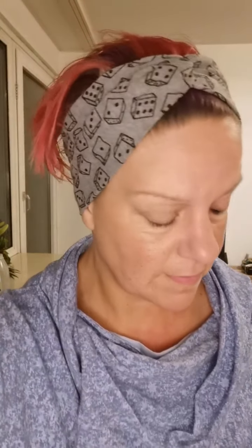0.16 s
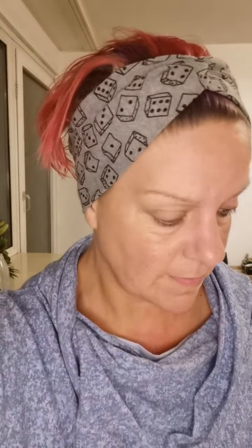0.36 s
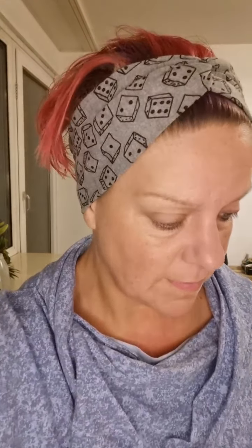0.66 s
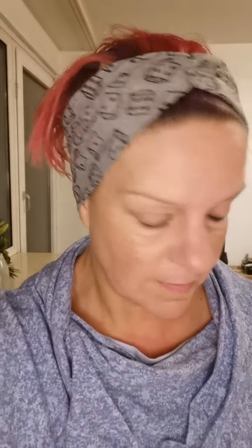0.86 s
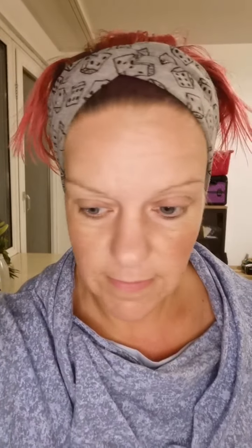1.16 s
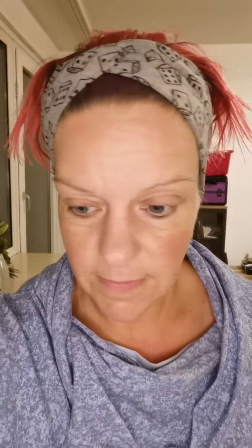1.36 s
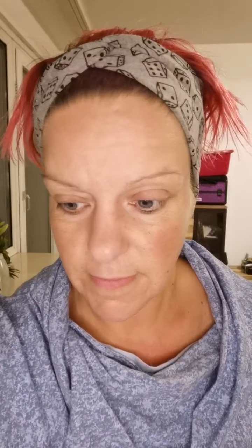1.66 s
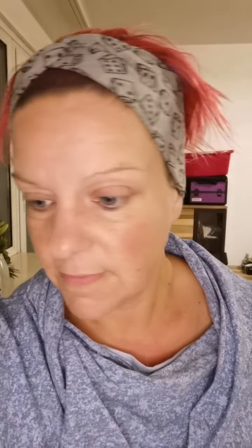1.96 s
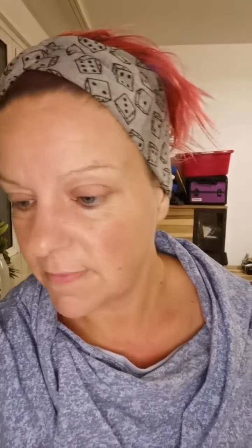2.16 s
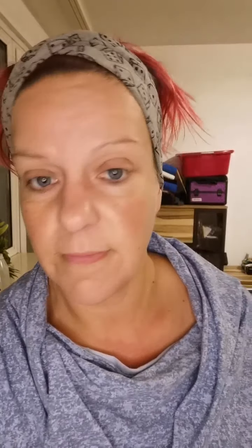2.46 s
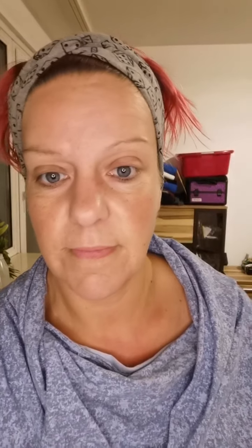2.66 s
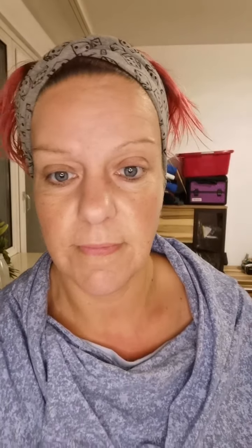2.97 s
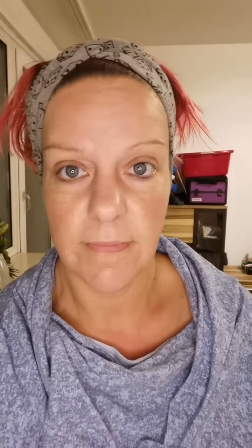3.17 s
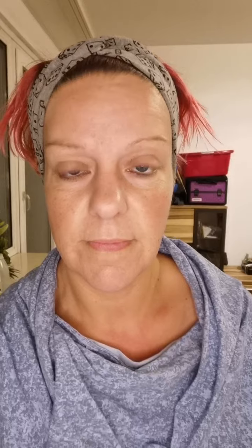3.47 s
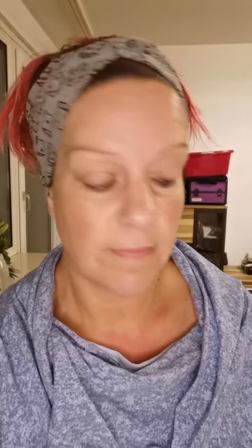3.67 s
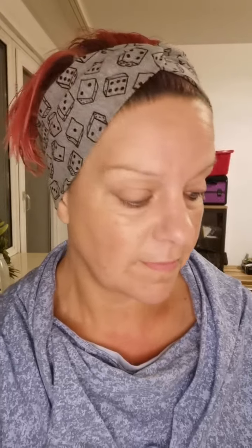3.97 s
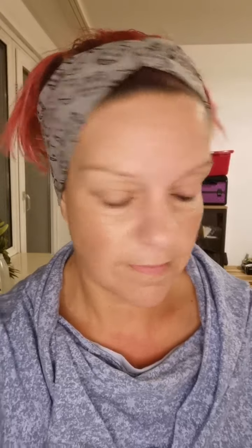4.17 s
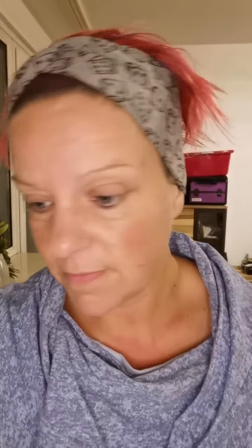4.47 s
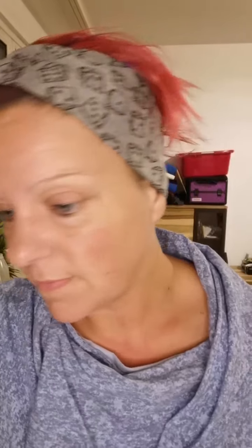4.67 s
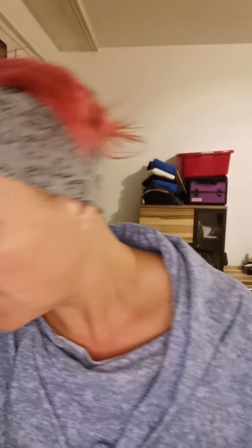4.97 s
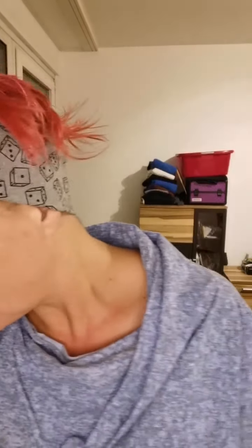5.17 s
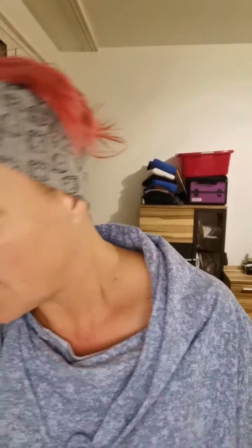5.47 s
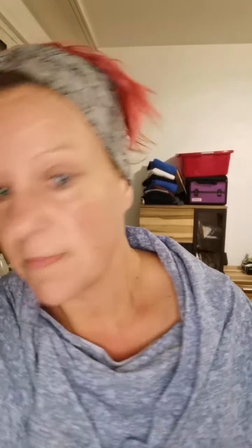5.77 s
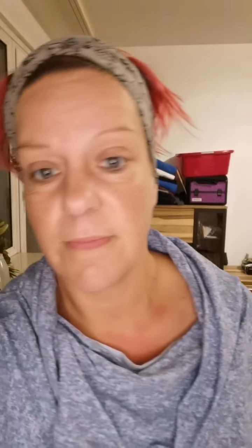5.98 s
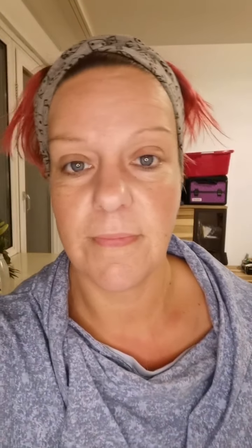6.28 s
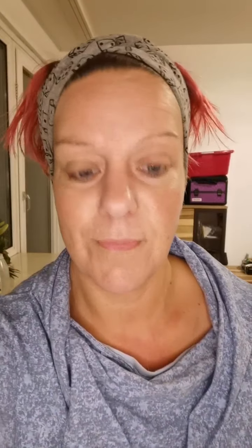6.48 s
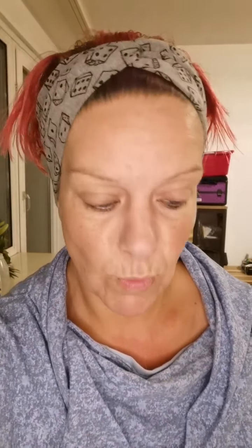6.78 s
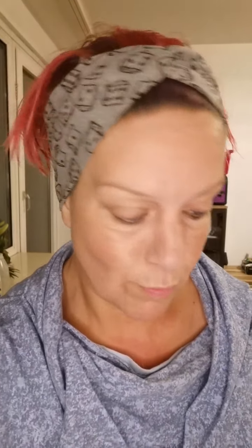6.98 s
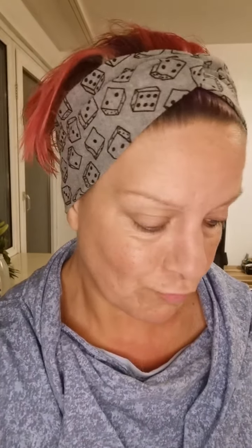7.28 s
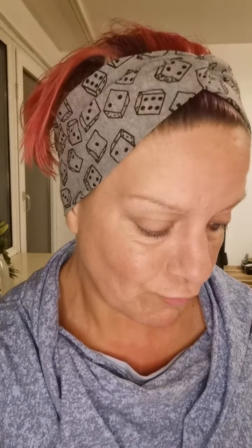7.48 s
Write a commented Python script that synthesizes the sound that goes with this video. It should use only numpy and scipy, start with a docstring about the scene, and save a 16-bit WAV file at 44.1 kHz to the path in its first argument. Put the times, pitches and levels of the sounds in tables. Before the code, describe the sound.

Close irregular clicks and woody knocks as small cases and pencils are set down, with faint cloth brushing and quiet room hiss.

```python
"""Small items handled on a wooden table

Plastic cases, pencils and a glass jar are picked up, opened and set down: table modes, item pitches and noise raps.
Plastic clicks are noise cracks with a sine ring; glass is trembling sine modes; rubs are uneven filtered noise.
A furnished room answers with decaying noise over steady background noise: room tone and the recorder's own hiss."""
import sys
import numpy as np
from scipy import signal
from scipy.fft import rfft, irfft
from scipy.io import wavfile

SR = 44100
rng = np.random.default_rng(int(sys.argv[2]) if len(sys.argv) > 2 else 0)


def persist_wave(psi):
    """Save psi, clipped to +-1, as 16-bit WAV."""
    counts = np.round(np.clip(psi, -1, 1) * 32767).astype(np.int16)
    wavfile.write(sys.argv[1], SR, np.atleast_2d(counts).T)


N = 335733


def from_db(db):
    """Amplitude factor of a level in dB."""
    return 10 ** (np.asarray(db) / 20)


def rms_one(x):
    """Scales to rms 1."""
    return x / np.sqrt(np.mean(x ** 2) + 1e-20)


def at_hz(points, hz):
    """Reads a table of (f/Hz, value), linear in log frequency."""
    table_hz, values = np.array(points)[:, :2].T
    return np.interp(np.log(hz), np.log(table_hz), values)


def coloured(white, spectrum):
    """Noise shaped to a spectrum in the frequency domain; rms 1."""
    hz = np.maximum(np.fft.rfftfreq(N, 1 / SR), 1)
    return rms_one(irfft(rfft(white) * from_db(at_hz(spectrum, hz)), N))


def flutter(rate_hz, depth_db):
    """Gain that wanders at random: normal dB values joined by lines."""
    steps = rng.standard_normal(int(N / SR * rate_hz) + 2)
    return from_db(depth_db * np.interp(np.arange(N) / SR * rate_hz, np.arange(len(steps)), steps))


def resonant(x, hz, width_hz):
    """Twice through one resonance; rms 1."""
    band = signal.iirpeak(hz, hz / width_hz, fs=SR)
    return rms_one(signal.lfilter(*band, signal.lfilter(*band, x)))


def band_pass(order, low_hz, high_hz):
    """Butterworth band filter."""
    return signal.butter(order, [low_hz, high_hz], "band", fs=SR, output="sos")


def dying(t60_s, t):
    """Exponential decay, 60 dB in t60."""
    return from_db(-60 * t / t60_s)


def add(out, start_s, peak_db, shape):
    """Lays in a sound scaled to the given peak."""
    i = round(start_s * SR)
    out[i:i + len(shape)] += (from_db(peak_db) * shape / np.abs(shape).max())[:N - i]


# knocks on the table: t/s, peak level/dB, item pitch f/Hz, upper rap level/dB re peak
KNOCKS = [(0.063, -28, 257, -17), (0.3959, -24, 381, -1.5), (0.401, -21.5, 326, -5),
          (0.56, -18, 447, -12.5), (0.594, -26.5, 620, -3.5), (0.637, -13.5, 918, -11),
          (0.657, -20.5, 412, 2.5), (0.947, -40, 362, -17.5), (1.064, -19, 857, -19.5),
          (1.372, -28.5, 444, -4.5), (1.385, -33, 426, -2), (1.426, -37, 526, -4),
          (1.5561, -34.5, 1647, -2.5), (1.66, -42, 957, 0), (1.69, -43.5, 1530, -17.5),
          (1.733, -48, 1266, -16.5), (2.12, -47.5, 215, -8.5), (2.381, -31.5, 590, -8),
          (2.394, -15.5, 878, -3.5), (2.397, -21.5, 421, -31), (2.402, -27.5, 203.7, -30),
          (2.528, -39, 253, -17), (3.038, -51, 626, -3.5), (3.367, -27.5, 414, -10),
          (3.477, -35.5, 412, -2.5), (3.51, -40.5, 363, 0), (3.534, -30, 299, -13),
          (3.581, -31.5, 440, -1.5), (3.807, -48.5, 478, -11.5), (4.207, -35.5, 378, -13.5),
          (4.222, -37.5, 233, -27), (4.378, -46, 770, -22.5), (4.389, -44.5, 263, -32),
          (5.175, -50.5, 383, -29), (5.835, -48.5, 910, 1), (5.935, -46, 490, -11), (5.979, -38, 663, -24),
          (5.995, -29.5, 300, -34), (6.03, -39.5, 408, -25), (6.059, -34, 334, -23),
          (6.124, -45.5, 425, -14), (6.221, -27.5, 452, -26), (6.258, -37, 520, -22),
          (6.312, -47, 530, -19), (6.348, -50, 417, -1), (6.43, -47.5, 406, -12),
          (6.462, -43.5, 400, -19.5), (6.509, -48, 535, -6.5), (6.604, -34.5, 432, -16),
          (6.775, -33.5, 290, -27), (6.845, -38, 347, -22), (6.958, -35.5, 447, -37),
          (7.029, -31, 377, -14), (7.247, -31.5, 812, -11), (7.246, -32.5, 1586, -17),
          (7.263, -33.5, 388, -10), (7.288, -28.5, 411, -8.5), (7.424, -43, 900, -1),
          (7.444, -37.5, 298, 1.5)]
# table top modes: f/Hz, level/dB, t60/s
TABLE_MODES = [(274, -15, .16), (338, -4, 0.168), (426, 6, 0.34), (453, -5.5, 0.11), (499.5, 3, 0.95),
               (601.4, 2.5, 0.17), (688, 4, 0.093), (787, 3, 0.058), (920, 3, 0.86), (1360, -54, 0.043)]
RAP_LAG_S = 0.002093
MIDDLING_KNOCK_DB, RATTLE_DB, RATTLE_DB_PER_DB = -35, -50.5, 0.78


def knocks(reach_octaves=1.0, item_db=9.5, free_db=-22, rise_s=0.00027, held_s=0.036,
           rattle_t60_s=0.19, floor_hz=190):
    """Item rings at its pitch and wakes nearby table modes; an upper rap and a rattle of loose things follow."""
    out, t = np.zeros(N), np.arange(SR // 4) / SR
    hz, mode_db, mode_t60_s = np.transpose(TABLE_MODES)[:, :, None]
    rise = 1 - np.exp(-(t / rise_s) ** 2)  # the blow takes a moment to spread
    free = from_db(free_db) * dying(mode_t60_s, t)
    radiate = signal.butter(4, floor_hz, "high", fs=SR, output="sos")  # small things push little bass
    upper = band_pass(3, 1100, 2300)
    for start_s, peak_db, pitch_hz, rap_db in KNOCKS:
        chance, phase = rng.standard_normal((2, len(TABLE_MODES), 1))
        noise = rng.standard_normal(len(t))
        bumps = from_db(4 * np.repeat(rng.standard_normal(len(t) // 250 + 1), 250)[:len(t)])

        # the hand stops the ring, sooner at high pitch
        held = from_db(-60 * (t / held_s) ** 2 * (pitch_hz / 400) ** 1.25)
        near_db = -6 * np.abs(np.log2(hz / pitch_hz)) / reach_octaves
        modes = from_db(mode_db + near_db + 4 * chance) * np.sin(2 * np.pi * hz * t + phase)
        item = from_db(item_db) * np.sin(2 * np.pi * pitch_hz * t) * held
        body = (modes * (held + free)).sum(axis=0) + item
        add(out, start_s, peak_db, signal.sosfilt(radiate, body * rise))

        # the edge lands after the body
        rap = signal.sosfilt(upper, noise * dying(0.027, t))
        add(out, start_s + RAP_LAG_S, peak_db + rap_db, rap)

        loose = signal.sosfilt(band_pass(2, .7 * pitch_hz, 2.2 * pitch_hz), noise[::-1] * bumps)
        rattle_db = RATTLE_DB + RATTLE_DB_PER_DB * (peak_db - MIDDLING_KNOCK_DB)
        add(out, start_s, rattle_db, loose * (1 - held) * dying(rattle_t60_s, t))
    return out


# heavier things set down: t/s, peak level/dB
THUDS = [(0.062, -39), (0.395, -29.5), (0.559, -39), (0.636, -25.5), (1.062, -35), (2.119, -48),
         (2.39, -33), (2.527, -67.5), (3.508, -43), (3.581, -41), (4.206, -40), (4.384, -49), (5.998, -46),
         (7.242, -43.5)]
# lowest table top modes: f/Hz, level/dB, t60/s
THUD_MODES = [(47, -10.5, 0.17), (125.8, -4.5, 0.24), (164.3, -1, 0.1), (199.8, 0.5, 0.095)]


def thuds(rise_s=0.0022):
    """The lowest modes of the table top swing out freely."""
    out, t = np.zeros(N), np.arange(SR // 4) / SR
    thud = sum(from_db(db) * np.sin(2 * np.pi * hz * t) * dying(t60_s, t) for hz, db, t60_s in THUD_MODES)
    thud *= 1 - np.exp(-(t / rise_s) ** 2)
    for start_s, peak_db in THUDS:
        add(out, start_s, peak_db, thud)
    return out


# plastic on plastic, before the peaks and dips: t/s, peak level of the ring/dB, ring f/Hz
TICKS = [(0.065, -19, 6200), (0.0644, -19, 2930), (0.401, -22.5, 6050), (0.407, -31.5, 4450),
         (0.5605, -32.5, 4760), (0.5906, -33.5, 4550), (0.6384, -21, 4930), (0.6582, -14.5, 7970),
         (0.6754, -27, 5000), (1.062, -30.5, 4010), (1.3688, -33.5, 2930), (1.3856, -29.5, 4960),
         (1.431, -39.5, 2900), (1.557, -39, 2750), (2.3676, -30, 5450), (2.392, -29.5, 4930),
         (2.398, -26.5, 4800), (2.529, -29.5, 6170), (2.532, -35.5, 4590), (3.3485, -45, 2720),
         (3.3662, -27.5, 5460), (3.473, -45.5, 7660), (3.5317, -40.5, 7160), (3.5791, -37, 2800),
         (4.208, -45, 2950), (4.9904, -39, 5500), (5.0392, -47.5, 7800), (5.1779, -36, 6240),
         (5.836, -45.5, 2850), (5.933, -53, 4800), (5.9866, -48, 2980), (5.9991, -38.5, 5050),
         (6.049, -45, 4870), (6.2151, -31, 4750), (6.2161, -34, 3170), (6.498, -46.5, 3040),
         (6.508, -43, 2880), (6.6027, -35.5, 3080), (6.6037, -37.5, 5100), (6.7738, -53, 3150),
         (6.8452, -51, 3120), (6.955, -42.5, 3200), (7.0278, -39.5, 2060), (7.2633, -33, 2900),
         (7.2867, -33, 1980), (7.4445, -38, 1470)]
RING_OVER_CRACK_DB, RING_T60_CYCLES, CRACK_T60_S = 2, 65, .015


def ticks(tail_db=-16, tail_t60_s=0.18, low_hz=1500, top_hz=13000):
    """Noise crack with a weaker tail, and the brief sine ring of the struck shell: (cracks, rings)."""
    cracks, rings, t = np.zeros(N), np.zeros(N), np.arange(SR // 8) / SR
    edges = band_pass(2, low_hz, top_hz)
    decay = dying(CRACK_T60_S, t) + from_db(tail_db) * dying(tail_t60_s, t)
    for start_s, peak_db, pitch_hz in TICKS:
        crack = signal.sosfilt(edges, rng.standard_normal(len(t)) * decay)
        ring = np.sin(2 * np.pi * pitch_hz * t) * dying(RING_T60_CYCLES / pitch_hz, t)
        add(cracks, start_s, peak_db - RING_OVER_CRACK_DB, crack)
        add(rings, start_s, peak_db, ring)
    return cracks, rings


# peaks and dips laid over the plastic clicks: f/Hz, width f/Hz, gain level/dB
PEAKS_AND_DIPS = [(3960, 180, -2), (4750, 1050, 7), (7680, 1240, 15.5), (10650, 19100, -17)]


def peaks_and_dips(x):
    """Bright peaks near 5 and 8 kHz, a slight dip near 4 kHz and a broad treble dip, laid over the clicks."""
    for hz, width_hz, db in PEAKS_AND_DIPS:
        x = x + (from_db(db) - 1) * signal.lfilter(*signal.iirpeak(hz, hz / width_hz, fs=SR), x)
    return x


# glass jar touched: t/s, peak level/dB
CLINKS = [(0.066, -33), (2.532, -48)]
# glass modes: f/Hz, level/dB, t60/s
JAR_MODES = [(1297, -12, .6), (2762, -2, .45), (4500, -5, .1), (6105, -4, .2), (6340, -8, .25),
             (6530, -3, .25), (11520, -9, .14)]


def clinks():
    """Glass rings in a few thin modes; the lid buzzes against it, so each mode trembles."""
    out, t = np.zeros(N), np.arange(SR // 2) / SR
    ring = np.zeros(len(t))
    for hz, db, t60_s in JAR_MODES:
        tremble = flutter(60, 2.5)[:len(t)]
        ring += from_db(db) * np.sin(2 * np.pi * hz * t) * dying(t60_s, t) * tremble
    for start_s, peak_db in CLINKS:
        add(out, start_s, peak_db, ring)
    return out


SWELL_SHARE = 0.39  # part of a stroke's length spent swelling


def stroke(out, sound, start_s, length_s, db):
    """Pressure swells and eases; lays the stroke into out."""
    end_s = start_s + length_s
    span = np.arange(max(round(start_s * SR), 0), min(round(end_s * SR), N))
    top_s = start_s + SWELL_SHARE * length_s
    swell = np.sin(np.interp(span / SR, [start_s, top_s, end_s], [0, np.pi / 2, np.pi]))
    out[span] += from_db(db) * swell * sound[span]


# skin and cloth brushing past: start t/s, length t/s, rms level at full swell/dB
BRUSHES = [(-.2, 0.51, -60), (0.316, 0.39, -60), (0.593, 0.29, -60), (0.982, 0.24, -63.5),
           (2.085, 0.24, -64), (3.36, 0.14, -65), (3.464, 0.25, -61), (4.305, 0.19, -57),
           (5.003, 0.32, -61.5), (5.153, 0.091, -54.5), (5.204, 0.078, -51.5), (5.25, 0.45, -66),
           (5.97, 0.22, -62), (6.157, 0.24, -65), (6.445, 0.11, -65), (6.748, 0.13, -67),
           (6.922, 0.15, -65), (7.217, 0.16, -59.5), (7.414, 0.039, -51), (7.42, .1, -61.5)]
# brush spectrum: f/Hz, relative level per Hz/dB
BRUSH_HISS = [(880, -43), (1500, -24.5), (2190, -22), (2960, -0.5), (3960, -10), (4280, 1), (6760, -6.5),
              (7670, 1.5), (9140, -11), (15300, -16)]


def brushes(grains):
    """Bright friction hiss of skin and cloth, patchy per band and as a whole."""
    out, hiss = np.zeros(N), coloured(grains, BRUSH_HISS)
    patchy = np.zeros(N)
    for low_hz in 1400 * 1.5 ** np.arange(6):
        patchy += signal.sosfilt(band_pass(2, low_hz, 1.5 * low_hz), hiss) * flutter(40, 1.8)
    hiss = rms_one(patchy) * flutter(50, 1.8)
    for start_s, length_s, db in BRUSHES:
        stroke(out, hiss, start_s, length_s, db)
    return out


# narrow-band scrapes and rubs, low to bright: start t/s, length t/s, rms level at full swell/dB, centre f/Hz
SCRAPES = [(0.289, 0.13, -54, 1230), (1.56, 0.21, -58.5, 1500), (1.773, 0.18, -63.5, 1445),
           (2.055, 0.3, -63, 1110), (2.112, 0.2, -62.5, 540), (2.031, 0.15, -59.5, 86.6),
           (4.205, 0.23, -69, 800), (4.291, 0.093, -53.5, 220), (5.965, 0.5, -55.5, 454),
           (5.165, 0.073, -50.5, 6400), (5.97, 0.046, -65.5, 3020), (6.106, 0.36, -68, 1850),
           (6.432, 0.13, -46.5, 424)]
SCRAPE_WIDTH_SHARE = 0.43  # bandwidth re centre


def scrapes(friction):
    """Narrow-band scrapes and rubs: uneven friction through one resonance per stroke."""
    out = np.zeros(N)
    for start_s, length_s, db, hz in SCRAPES:
        stroke(out, resonant(friction, hz, SCRAPE_WIDTH_SHARE * hz), start_s, length_s, db)
    return out


# table top rumble while things are pushed about: t/s, rms level/dB
RUMBLE = [(0.0, -46.5), (0.34, -55.5), (0.538, -44), (0.922, -52), (1.32, -65), (1.7, -64)]
RUMBLE_HZ, RUMBLE_WIDTH_HZ = 168, 347


def rumble(friction):
    """Pushing shakes the table top: uneven friction through a broad low resonance."""
    s, db = np.transpose(RUMBLE)
    level_db = np.interp(np.arange(N) / SR, s, db, right=-120)
    return from_db(level_db) * resonant(friction, RUMBLE_HZ, RUMBLE_WIDTH_HZ)


def slides(grain_db=2.5):
    """Uneven friction: grainy noise drives brushes, scrapes and rumble."""
    grains = rng.standard_normal(N) * from_db(grain_db * np.minimum(rng.exponential(1, N), 4))
    friction = grains[::-1] * flutter(60, 3.5)
    return brushes(grains) + scrapes(friction) + rumble(friction)


# reverberation: f/Hz, t60/s
ROOM = [(100, 0.52), (500, 0.37), (2000, 0.49), (6000, 0.32), (14000, 0.28)]
ROOM_DB, ROOM_GAP_S, ROOM_DULL_HZ = -6.5, 0.0087, 4430


def room(x):
    """Dense echoes: octave bands of noise, each dying at its own rate, dulled, after a short gap."""
    t = np.arange(SR * 3 // 5) / SR
    tail, white = np.zeros(len(t)), rng.standard_normal(len(t))
    for low_hz in 60 * 2. ** np.arange(8):
        band = signal.sosfilt(band_pass(2, low_hz, 2 * low_hz), white)
        tail += band * dying(at_hz(ROOM, low_hz * np.sqrt(2)), t)
    tail /= np.sqrt(np.sum(tail ** 2))
    tail = np.r_[np.zeros(round(ROOM_GAP_S * SR)), tail]
    dull = signal.lfilter(*signal.butter(1, ROOM_DULL_HZ, fs=SR), tail)
    return from_db(ROOM_DB) * signal.fftconvolve(x, dull)[:N]


# background spectrum: f/Hz, relative level per Hz/dB
BACKGROUND = [(12, -13), (20, 9), (45, 6), (75, -5.5), (125, 0.5), (185, -4), (282, -7), (352, -7.5),
              (565, -12.5), (2210, -22.5), (2760, -20.5), (3750, -27), (4810, -19.5), (6190, -29.5),
              (8170, -24), (9930, -37), (13500, -26), (15500, -26.5)]
BACKGROUND_DB = -61  # rms before flutter


def background():
    """Steady room tone and the recorder's own hiss: coloured noise, level wandering slightly."""
    return from_db(BACKGROUND_DB) * coloured(rng.standard_normal(N), BACKGROUND) * flutter(3.1, 0.54)


def scene(crack_carry_db=6.5):
    """Touches with echoes, sliding and background; the thin shell rings do not carry into the room."""
    cracks, rings = peaks_and_dips(np.array(ticks()))
    touches = knocks() + thuds() + clinks()
    echoes = room(touches + from_db(crack_carry_db) * cracks)
    return (touches + cracks + rings + echoes + slides() + background())[None]


def record(dry):
    """A steep low-pass cuts the top."""
    return signal.sosfilt(signal.ellip(12, .5, 70, 15350, fs=SR, output="sos"), dry)


dry = scene()
out = record(dry)
persist_wave(out)
```